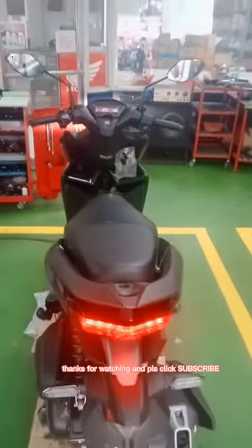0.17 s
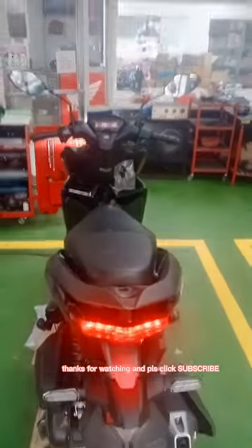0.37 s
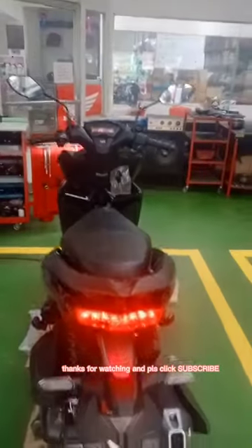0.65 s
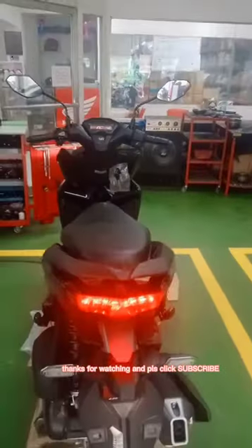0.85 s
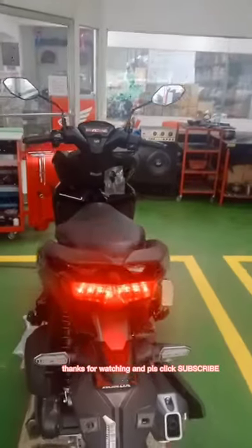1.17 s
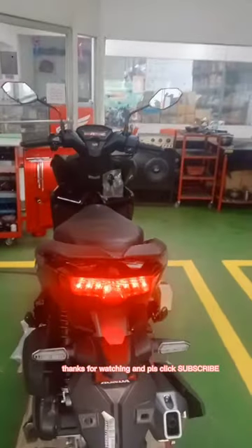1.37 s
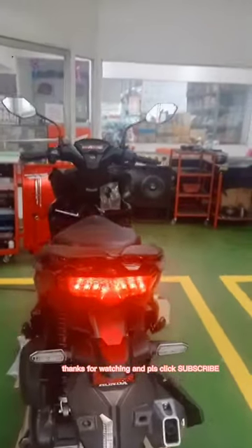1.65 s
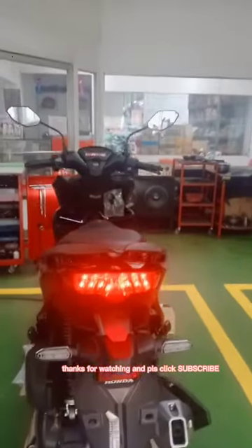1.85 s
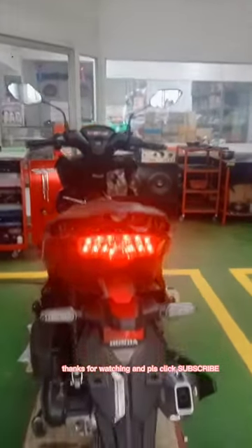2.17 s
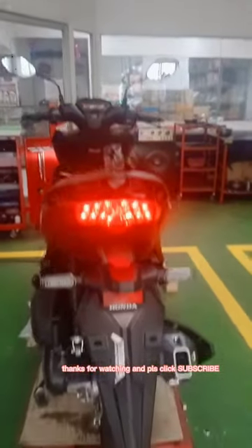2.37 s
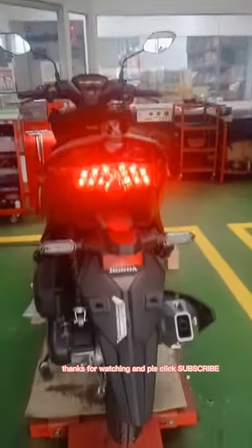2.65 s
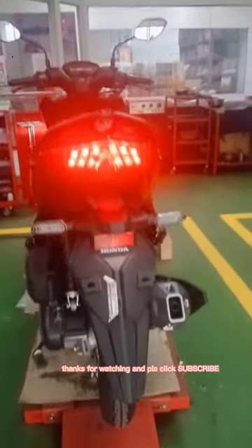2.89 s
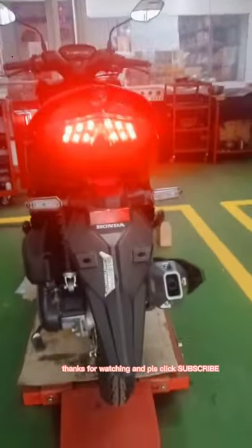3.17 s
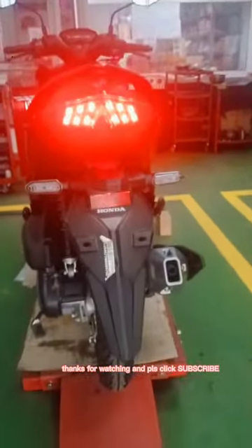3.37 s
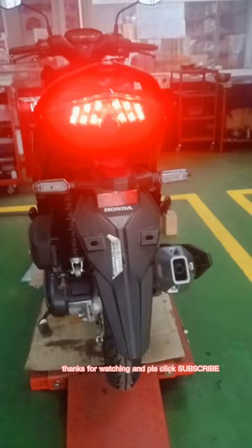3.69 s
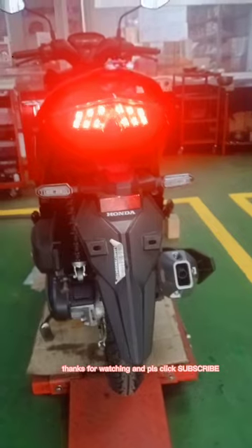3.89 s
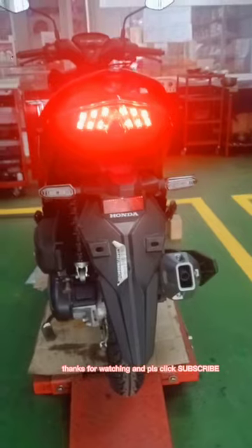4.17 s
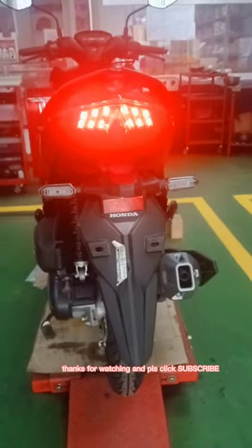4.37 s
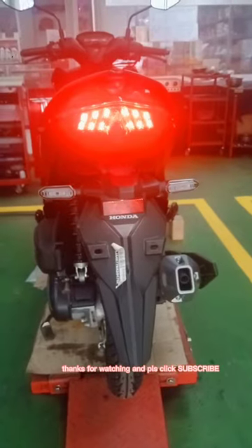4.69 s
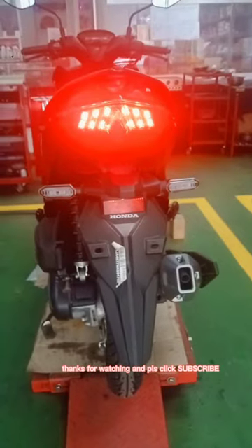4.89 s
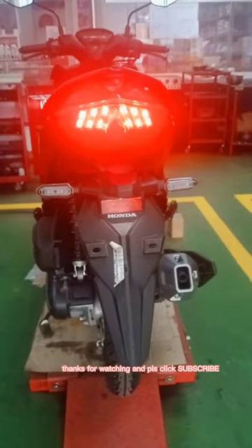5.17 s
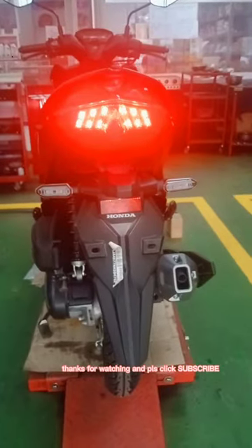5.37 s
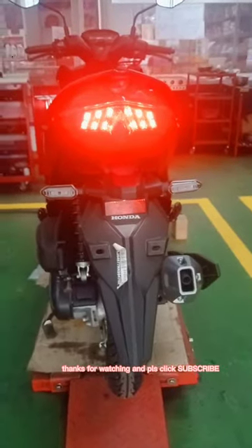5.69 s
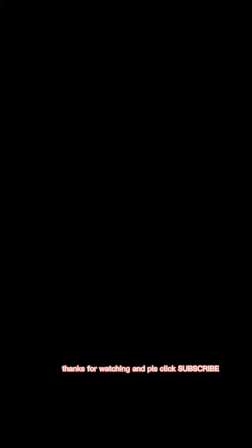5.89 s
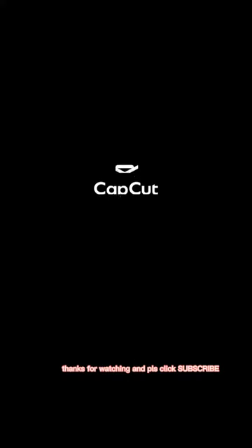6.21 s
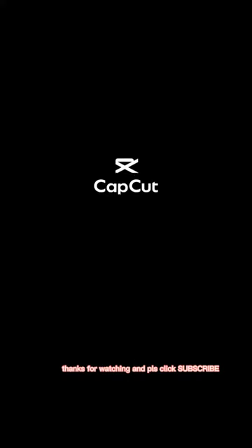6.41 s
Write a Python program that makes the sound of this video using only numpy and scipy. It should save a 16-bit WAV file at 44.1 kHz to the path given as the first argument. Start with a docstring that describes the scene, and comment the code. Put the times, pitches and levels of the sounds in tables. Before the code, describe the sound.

A small scooter idles evenly in a hard, echoing workshop, its quick puttering mixed with clatter and transmission whirr. About half a second in, metal clanks and rings. A bright grainy rasp swells and sinks near two seconds. The close microphone drifts behind the tail, where whirr fades and low exhaust puffs stand out with soft hiss. The sound cuts off abruptly.

```python
"""A single-cylinder four-stroke scooter idles on a lift in a hard-walled workshop: pulses filtered by resonant bodies.
Early on something metal clanks once, as decaying modes; small things tick now and then, and a bright rasp swells and sinks.
The microphone then drifts round to the tail: whirr and flank hiss fade behind the exhaust beat, and a jet hiss swells.
Late come a soft swish, of shaped noise, and a swell of low tones locked to the engine's speed.
The sound is cut off abruptly shortly before the end."""
import sys
import numpy as np
from scipy import signal
from scipy.fft import rfft, irfft
from scipy.io import wavfile

SR = 44100
rng = np.random.default_rng(int(sys.argv[2]) if len(sys.argv) > 2 else 0)


def persist_wave(psi):
    """Save psi, clipped to +-1, as 16-bit WAV."""
    counts = np.round(np.clip(psi, -1, 1) * 32767).astype(np.int16)
    wavfile.write(sys.argv[1], SR, np.atleast_2d(counts).T)


N = 288485
TIME = np.arange(N) / SR


def amp(db):
    """Level definition: amplitude ratio of a level in dB."""
    return 10 ** (np.asarray(db) / 20)


def unit(x):
    """Normalisation: scales a signal to rms 1."""
    return x / np.sqrt(np.mean(x ** 2) + 1e-20)


def curve(rows):
    """Linear interpolation: joins (t/s, value) rows by straight lines."""
    return np.interp(TIME, *np.transpose(rows))


def read(points, hz):
    """Logarithmic frequency scale: reads a spectrum between its points."""
    f, value = np.transpose(points)
    return np.interp(np.log(hz + 1e-3), np.log(f), value)


def add(mix, s, sound):
    """Superposition: adds a sound to the mix from time s on."""
    part = mix[round(s * SR):][:len(sound)]
    part += sound[:len(part)]


def drift(corner_hz, size=2048):
    """Low-pass random process: slow Gaussian fluctuation of rms 1."""
    hz = np.fft.rfftfreq(size, N / SR / size)
    spectrum = rfft(rng.standard_normal(size)) * np.exp(-(hz / corner_hz) ** 2)
    return unit(np.interp(TIME, np.linspace(0, N / SR, size), irfft(spectrum)))


def swell(top_s, hold_s, rise_db_per_s, fall_db_per_s):
    """Exponential growth and decay: gain climbs to 1 at top_s, holds, and dies away."""
    before = np.maximum(top_s - TIME, 0)
    after = np.maximum(TIME - top_s - hold_s, 0)
    return amp(-rise_db_per_s * before - fall_db_per_s * after)


def body(db_at, size=16384):
    """Minimum-phase filtering: causal response, of energy 1, of a body whose gain in dB is db_at(Hz)."""
    hz = abs(np.fft.fftfreq(size, 1 / SR))
    log_gain = np.log(amp(np.maximum(db_at(hz), -100)))
    # The Hilbert transform of the log gain gives the phase.
    transfer = np.exp(np.conj(signal.hilbert(log_gain)))
    response = np.fft.ifft(transfer).real[:size // 2]
    return response / np.linalg.norm(response)


def colour(x, spectrum):
    """Source-filter principle: passes x through a body with this spectrum; rms 1."""
    return unit(signal.oaconvolve(x, body(lambda hz: read(spectrum, hz)))[:N])


# Reverberation of the workshop: f/Hz, t60/s
REVERBERATION = [(200, 1), (2000, 0.82), (6500, .8), (11000, 0.78), (15500, 0.35)]


def workshop(x, wet_db):
    """Diffuse-field reverberation: direct sound plus dense reflections whose highest treble dies first."""
    hz, t, noise = signal.stft(rng.standard_normal(SR), SR, nperseg=256)
    decay = amp(-60 * t / read(REVERBERATION, hz)[:, None])
    tail = signal.istft(noise * decay, SR, nperseg=256)[1]
    response = amp(wet_db) * tail / np.linalg.norm(tail)
    response[0] += 1  # direct sound
    return signal.oaconvolve(x, response / np.linalg.norm(response))[:len(x)]


def flutter(x, delay_s=.0269, loss_db=-2.0, count=6):
    """Flutter echo: sound bounces to and fro between two parallel walls."""
    out = np.zeros(N)
    for bounce in range(count):
        add(out, bounce * delay_s, amp(bounce * loss_db) * x)
    return out


# Microphone's way round the scooter: t/s, position (0 beside the engine to 1 behind the tail)
MICROPHONE_WAY = [(0, 0.008), (2.05, 0), (2.8, 0.16), (3.4, .57), (4.8, 0.86)]


def heard(beside_db, behind_db, reached=1):
    """Directivity and shading: a source's gain changes with position, fully at the share `reached` of the way."""
    way = np.minimum(curve(MICROPHONE_WAY) / reached, 1)
    return amp(beside_db + (behind_db - beside_db) * way)


def strokes(cycles, share, scatter_db):
    """Periodic impulse excitation: one impulse of uneven strength each time the cycle passes this point."""
    at = np.flatnonzero(np.diff(np.floor(cycles - share)) > 0)
    out = np.zeros(N)
    out[at] = amp(scatter_db * rng.standard_normal(len(at)))
    return out


def gusts(cycles, share, length, steady):
    """Modulated flow noise: it surges at one point of each cycle and dies away over `length` of a cycle."""
    surge = np.exp(-((cycles - share) % 1) / length)
    return (steady + surge) * rng.standard_normal(N)


def burst(decay_s, size=4096):
    """Contact excitation: a brief decaying scrape of noise, of energy 1."""
    noise = rng.standard_normal(size) * np.exp(-TIME[:size] / decay_s)
    return noise / np.linalg.norm(noise)


# Light contacts: t/s, level/dB, centre f/Hz, width/octaves
LIGHT_CONTACTS = [(0.237, -9.5, 11000, 0.66), (1.5852, -1, 5590, .1), (1.6896, -6, 5081, .06),
                  (1.7692, -6, 5880, .08), (1.8736, -18.5, 9000, .6), (2.079, -12.5, 10000, 0.66),
                  (3.7194, -21, 11300, 0.16), (5.155, -18, 5200, 0.04), (5.1894, -14, 5200, 0.04)]


def ticks():
    """Band-limited impact: light contacts of small hard things about the shop each excite one resonance."""
    out = np.zeros(N)
    for s, db, centre_hz, octaves in LIGHT_CONTACTS:
        resonance = lambda hz: -20 * np.log10(1 + (np.log2((hz + 1) / centre_hz) / octaves) ** 2)
        tick = signal.fftconvolve(burst(decay_s=0.0051), body(resonance, size=4096))
        add(out, s, amp(db) * tick)
    return workshop(out, wet_db=3.5)


# Soft rub, like a sole on the floor: f/Hz, relative level per hertz/dB
SWISH_SPECTRUM = [(1500, -25), (2900, -4), (3700, 10.5), (4500, 1), (6200, -1.5), (8000, -8.5), (9300, -17),
                  (12000, -19), (15500, -26)]


def swish(top_db=-32.5):
    """Friction noise: a short rub swells and fades, with the room's tail after it."""
    level = amp(top_db) * swell(top_s=4.885, hold_s=.035, rise_db_per_s=220, fall_db_per_s=600)
    return workshop(level * colour(rng.standard_normal(N), SWISH_SPECTRUM), wet_db=-2.0)


# Blows as the metal lands and rattles: t/s, level/dB, tilt/(dB per octave)
METAL_BLOWS = [(0.5423, 11, 6), (0.551, 10.5, 2), (0.562, 11.5, -2), (0.577, 10, -12.5), (0.612, 6.5, -4),
               (0.643, 4.5, -7.5)]
# Crash of each blow before its tilt: f/Hz, relative level per hertz/dB
CRASH_SPECTRUM = [(400, -31.5), (850, -20), (1080, 0), (1400, -15), (1620, -5), (1780, 4), (1950, -3),
                  (2700, 1), (3300, -2.5), (5200, -4.5), (5800, -12), (6450, 2), (7100, -5), (8300, -1),
                  (9100, -17.5), (15500, -23)]
# Ringing modes of the metal: f/Hz, relative level/dB, t60/s
METAL_MODES = [(1050, -4, 0.88), (1160, -4, 0.88), (1720, -2, 0.73), (1750, -1, .9), (1775, 1, 0.88),
               (1835, -1.5, 0.93), (2680, -6, 0.56), (6325, -4, .6), (6340, -11, .6), (6530, -7, .7),
               (6585, -11, .6), (7250, -12, .6), (7865, -8, .6), (8195, -12, .6), (8441, -9, .4),
               (8390, -15, .5)]


def clank(ring_db=-24, swell_s=.014):
    """Modal vibration: metal lands and rattles; its modes ring on while the room fills."""
    crash, ring, t = np.zeros(N), np.zeros(N), TIME[:SR]
    for s, db, tilt_db in METAL_BLOWS:
        octaves = lambda hz: np.log2(np.clip(hz, 1500, 7000) / 3500)
        response = body(lambda hz: read(CRASH_SPECTRUM, hz) + tilt_db * octaves(hz), size=4096)
        add(crash, s, amp(db) * signal.fftconvolve(burst(decay_s=0.006), response))
    modes = sum(amp(db - 60 * t / t60) * np.sin(2 * np.pi * hz * t) for hz, db, t60 in METAL_MODES)
    first_blow_s = METAL_BLOWS[0][0]
    add(ring, first_blow_s, modes * (1 - np.exp(-t / swell_s)))
    return workshop(crash, wet_db=0.5) + amp(ring_db) * ring


# Low tones: multiple of the firing rate, relative level/dB
DRONE_TONES = [(12.1, -5.5), (14.4, -11), (15.4, -5), (18.2, 0), (24.3, -12), (30.7, -9.5), (36.2, -12)]


def drone(cycles, waver=0.07, faint_db=-51, top_db=-36.5):
    """Phase modulation: wavering low tones follow the engine's speed and swell near the end; waver in turns."""
    tones = sum(amp(db) * np.sin(2 * np.pi * (k * cycles + waver * drift(5.4))) for k, db in DRONE_TONES)
    rise = swell(top_s=5.39, hold_s=.32, rise_db_per_s=110, fall_db_per_s=25)
    return (amp(faint_db) + amp(top_db) * rise) * unit(tones)


# Knocks of valves and piston: share of the cycle, relative level/dB
ENGINE_KNOCKS = [(.2, 0.5), (.45, 3.5), (.58, -3.5), (.76, 0), (.9, -2.5)]


def rattle(cycles, knock_db, grain_db, grains_per_s=700):
    """Impact noise: regular knocks and loose chatter are blurred by the room, over a smooth pulsing rush."""
    knocks = sum(amp(db) * strokes(cycles + .004 * drift(9), share, scatter_db=2)
                 for share, db in ENGINE_KNOCKS)
    chatter = rng.standard_normal(N) * (rng.random(N) < grains_per_s / SR)
    impacts = unit(workshop(amp(knock_db) * unit(knocks) + unit(chatter), wet_db=1.5))
    rush = unit(gusts(cycles, .45, length=0.34, steady=2.6))
    return amp(grain_db) * impacts + rush


# Grainy, bright rasp: f/Hz, relative level per hertz/dB
RASP_SPECTRUM = [(2500, -20.5), (3300, -11.5), (3750, 0), (4100, 3), (4550, -3.5), (5100, -7),
                 (5500, -10.5), (5850, -4.5), (6300, -13.5), (8000, -20), (11000, -40), (15500, -46)]


def rasp(cycles, faint_db=-34, top_db=-35.0, lower=0.97, sinks_s=2.13, sinking_s=.48):
    """Spectral crossfade: a bright rasp creeps in, bites harder, then its colour sinks a little as it fades."""
    grit = rattle(cycles, knock_db=-10, grain_db=5)
    sink = np.clip((TIME - sinks_s) / sinking_s, 0, 1)
    high = colour(grit, RASP_SPECTRUM)
    low = colour(grit, [(hz * lower, db) for hz, db in RASP_SPECTRUM])
    creep = amp(faint_db) * swell(top_s=1.62, hold_s=1.0, rise_db_per_s=33, fall_db_per_s=21)
    bite = amp(top_db) * swell(top_s=1.756, hold_s=0.65, rise_db_per_s=250, fall_db_per_s=110)
    return (creep + bite) * ((1 - sink) * high + sink * low)


# Hiss from the engine's flank: f/Hz, relative level per hertz/dB
FLANK_SPECTRUM = [(1000, -45), (4000, -27), (5300, -14.5), (6500, -3.5), (7600, 1), (8200, -3), (9100, -15),
                  (10400, -19), (11600, -26), (12500, -21), (13700, -20.5), (15500, -25.5)]
# Hiss at the tail pipe: f/Hz, relative level per hertz/dB
JET_SPECTRUM = [(1000, -30), (2000, -13), (2700, 5), (3700, -6.5), (5200, 2.5), (6400, 0), (8100, -6),
                (9300, -15.5), (13000, -23), (15500, -29.5)]


def hiss(cycles, jet_db=-52, jet_top_db=-46.5):
    """Directivity of jet noise: flank hiss is soon hidden; a pulsing one swells as the pipe points at the microphone."""
    rush = unit(gusts(cycles, 0.48, length=.3, steady=1.5))
    fizz = unit(rattle(cycles, knock_db=-5, grain_db=-3.5) + amp(-2.5) * rush)
    flank = heard(beside_db=-38.5, behind_db=-60.5, reached=0.15) * colour(fizz, FLANK_SPECTRUM)
    aim = swell(top_s=3.65, hold_s=0.39, rise_db_per_s=32, fall_db_per_s=11.0)
    jet = colour(gusts(cycles, 0.53, length=.25, steady=1.2), JET_SPECTRUM)
    return flank + (amp(jet_db) + amp(jet_top_db) * aim) * jet


# Engine clatter heard from all sides: f/Hz, relative level per hertz/dB
CLATTER_SPECTRUM = [(150, -13), (330, 1), (620, 0), (800, -2.5), (1100, -4), (1750, -2.5), (2150, -7),
                    (2600, -4), (3100, -1), (3800, -3), (4600, -15), (7800, -31.5), (9500, -34),
                    (15500, -48.5)]
# Whirr of the transmission case: f/Hz, relative level per hertz/dB
WHIRR_SPECTRUM = [(400, -12.5), (690, -8.5), (900, -4.5), (1040, -6), (1250, -1), (1370, -3), (1520, 0.5),
                  (1900, -3.5), (2300, -6), (2800, -20), (3200, -13), (3470, -4.5), (3800, -15),
                  (4800, -29), (9000, -42.5)]


def machinery(cycles):
    """Structure-borne radiation: the head clatters evenly all round; the bodywork shades the transmission's whirr."""
    clatter = amp(-32) * colour(rattle(cycles, knock_db=-3.5, grain_db=2.0), CLATTER_SPECTRUM)
    whirr = colour(rattle(cycles, knock_db=-9.0, grain_db=1.5), WHIRR_SPECTRUM)
    return clatter + heard(beside_db=-27.5, behind_db=-41.5) * whirr


# Tones the beat keeps up in the room: multiple of the firing rate, relative level/dB
HUM_TONES = [(4, -3.5), (5, -3), (7, -3.5), (8, -5), (13, 3), (16, 2), (19, 0.5)]
# Booms of the room on the sixth multiple: start t/s, length t/s, level/dB
ROOM_BOOMS = [(1.25, 0.19, -34), (1.9, .08, -38), (3.06, 0.87, -38.5)]


def hum(cycles, opens, sixth_db=-52, ninth_db=-44.5, hum_db=-42, waver=0.044, ninth_waver=0.081, wander_db=3):
    """Forced room resonance: low tones ring on multiples of the firing rate; the ninth wanders, the sixth booms."""
    def tone(k, turns):
        return np.sqrt(2) * np.cos(2 * np.pi * (k * (cycles - opens) + turns * drift(3)))

    booms = sum(amp(db) * swell(s, length, rise_db_per_s=95, fall_db_per_s=60) for s, length, db in ROOM_BOOMS)
    sixth = np.maximum(amp(sixth_db), booms) * tone(6, waver)
    ninth = amp(ninth_db + wander_db * drift(4.9)) * tone(9, ninth_waver)
    others = unit(sum(amp(db) * tone(k, waver) for k, db in HUM_TONES))
    return sixth + ninth + amp(hum_db) * others


# Level of thump and puff together, before their own gains: t/s, level/dB
EXHAUST_GAIN = [(.7, -35), (1.5, -30.5), (4.6, -33), (5.9, -32.5)]
# Exhaust thump: f/Hz, relative level per hertz/dB
THUMP_SPECTRUM = [(20, -55), (37, -25), (50, -9.5), (62, -8.5), (78, 4.5), (100, 2), (115, -1.5),
                  (135, -2.5), (160, -6), (200, -8), (260, -21.5), (500, -38), (4000, -82)]
# Gas rushing from the silencer: f/Hz, relative level per hertz/dB
PUFF_SPECTRUM = [(20, -45), (32, -35), (45, -16), (58, -12.5), (78, 2), (110, 2), (135, 1), (165, 1.5),
                 (205, -2.5), (270, -7), (450, -11), (800, -20.5), (2000, -36.5), (8000, -78.5)]
# Hollow note of the tail pipe, heard from behind: f/Hz, relative level per hertz/dB
PIPE_SPECTRUM = [(250, -46.5), (400, -10), (450, 3), (500, -10), (580, -14), (630, -6), (700, -21),
                 (1500, -55.5), (4000, -79.5)]
# The few firings that puff much harder: t/s, extra level/dB
HARD_FIRINGS = [(1.14, 9.5), (2.13, 6), (2.21, 6.5), (4.0, 6), (4.1, 7), (4.33, 6.5), (5.24, 6)]


def exhaust(cycles, opens=.59, thump_db=-8, puff_db=-5, surge_s=0.027, uneven_db=1.5):
    """Pulsed monopole radiation: each valve opening thumps the silencer and lets out a puff; some puff harder."""
    surge = amp(uneven_db * drift(9))
    for s, db in HARD_FIRINGS:
        add(surge, s, (amp(db) - 1) * np.exp(-(TIME[:SR] / surge_s) ** 2))
    thump = colour(flutter(strokes(cycles, opens, scatter_db=3.5)), THUMP_SPECTRUM)
    puff = colour(surge * gusts(cycles, opens, length=.35, steady=2.2), PUFF_SPECTRUM)
    beat = amp(curve(EXHAUST_GAIN)) * (amp(thump_db) * thump + amp(puff_db) * puff)
    pipe = colour(gusts(cycles, opens, length=0.61, steady=1.5), PIPE_SPECTRUM)
    pipe = heard(beside_db=-52.5, behind_db=-43.0, reached=.6) * pipe
    return beat + pipe + hum(cycles, opens)


# Engine speed: t/s, firing rate f/Hz
FIRING_RATE = [(0, 12.31), (.6, 12.32), (2.05, 12.39), (2.85, 12.55), (3.6, 12.2), (4.25, 12.27),
               (4.75, 12.41), (5.9, 12.3)]


def scene():
    """Phase as the integral of frequency: one running cycle count drives every engine sound."""
    cycles = np.cumsum(curve(FIRING_RATE)) / SR
    shop = ticks() + swish() + clank()
    engine = drone(cycles) + rasp(cycles) + hiss(cycles) + machinery(cycles) + exhaust(cycles)
    mono = shop + engine
    return np.array([mono, mono])


def record(dry, low_cut_hz=42, stop_s=5.9, fade_s=.009, edge_hz=15600):
    """Band limitation: the microphone drops the deepest bass, the sound is cut off, then the treble is limited."""
    lean = signal.sosfilt(signal.butter(4, low_cut_hz, "high", fs=SR, output="sos"), dry)
    cut = lean * np.clip((stop_s - TIME) / fade_s, 0, 1)
    low_pass = signal.firwin(511, edge_hz, window=("kaiser", 9), fs=SR)
    return signal.oaconvolve(cut, low_pass[None], "same")


dry = scene()
out = record(dry)
persist_wave(out)
```